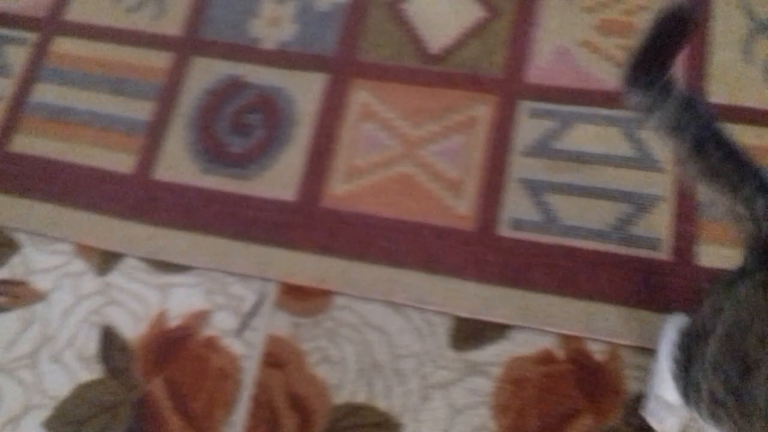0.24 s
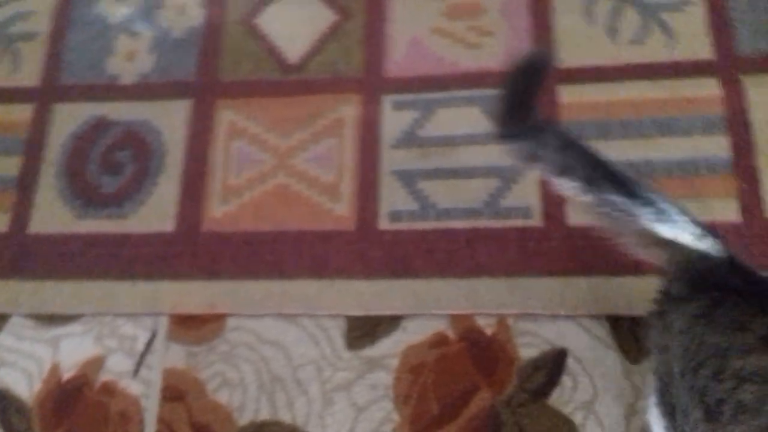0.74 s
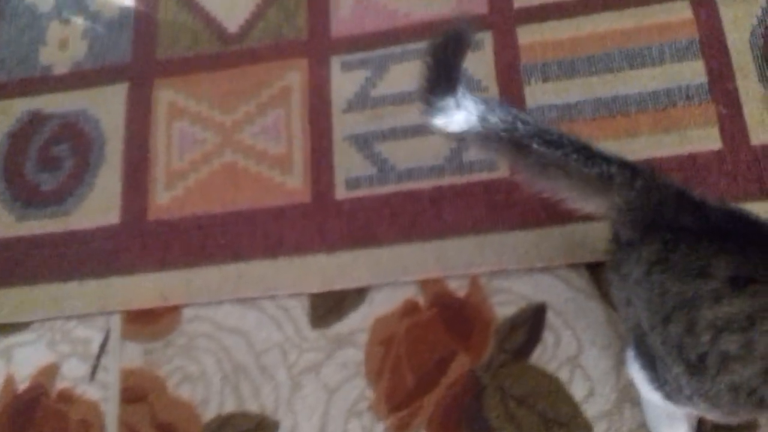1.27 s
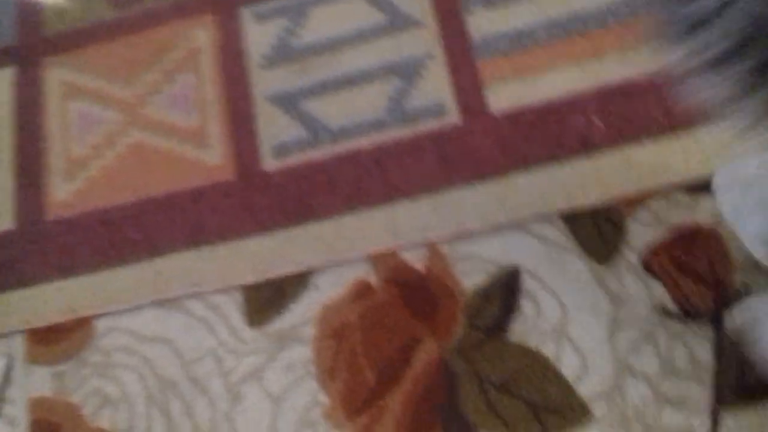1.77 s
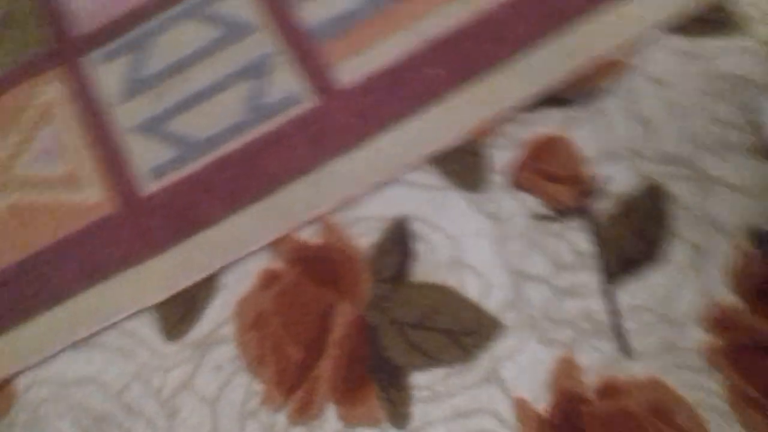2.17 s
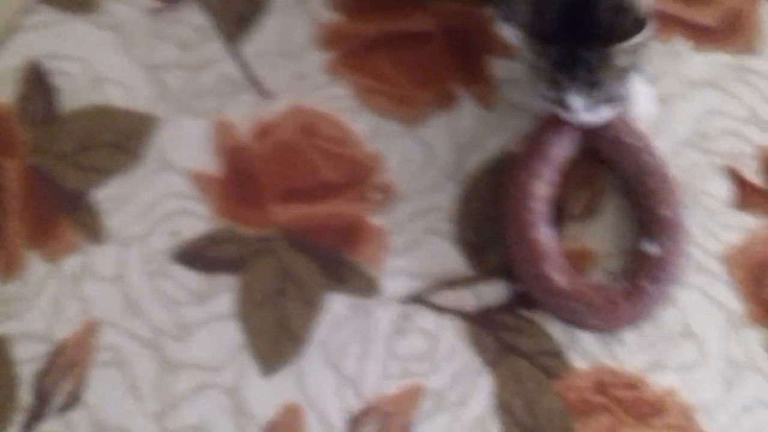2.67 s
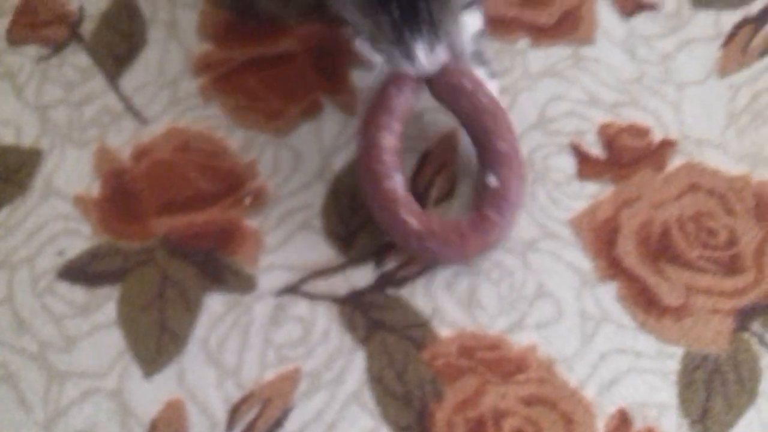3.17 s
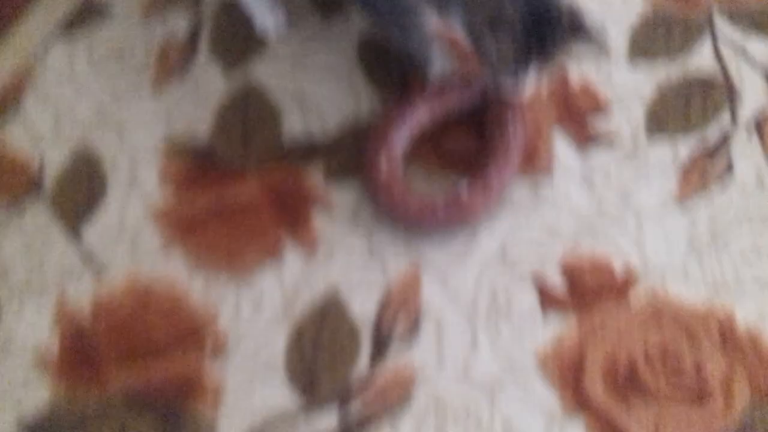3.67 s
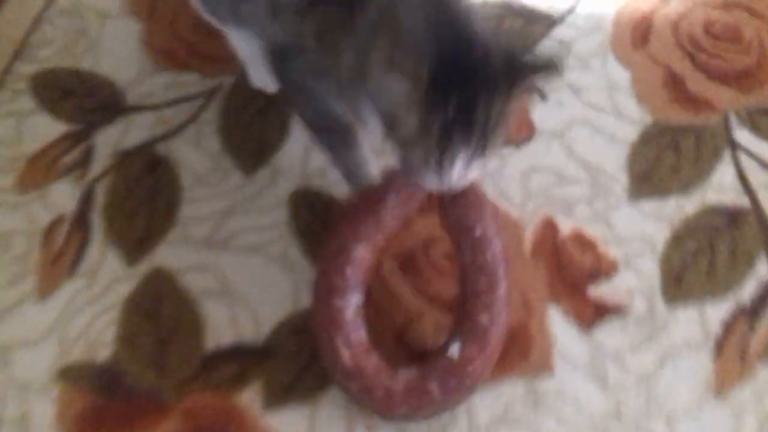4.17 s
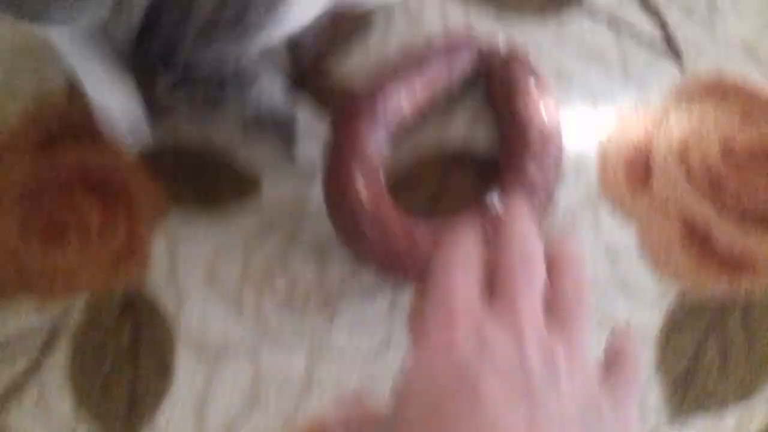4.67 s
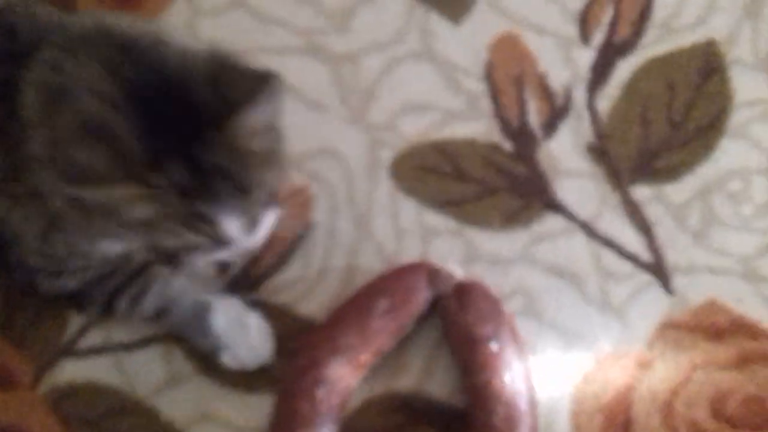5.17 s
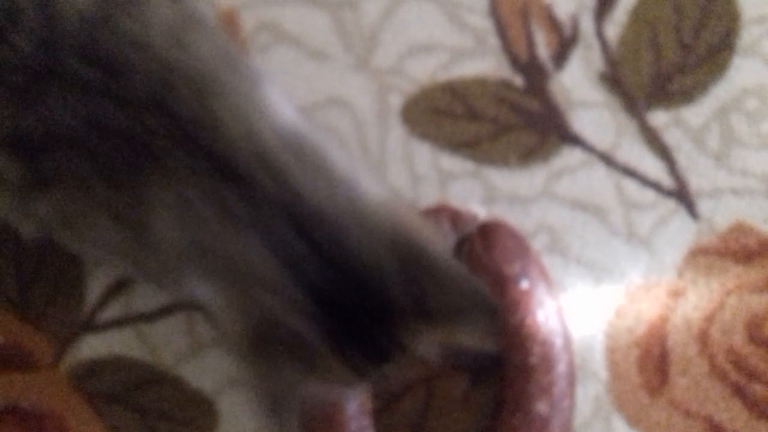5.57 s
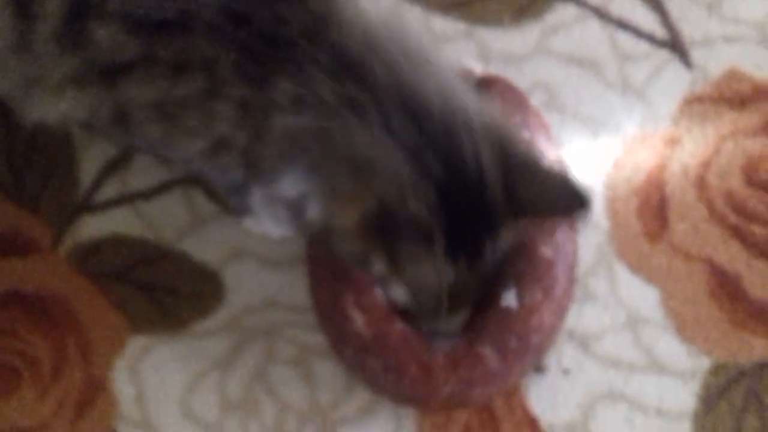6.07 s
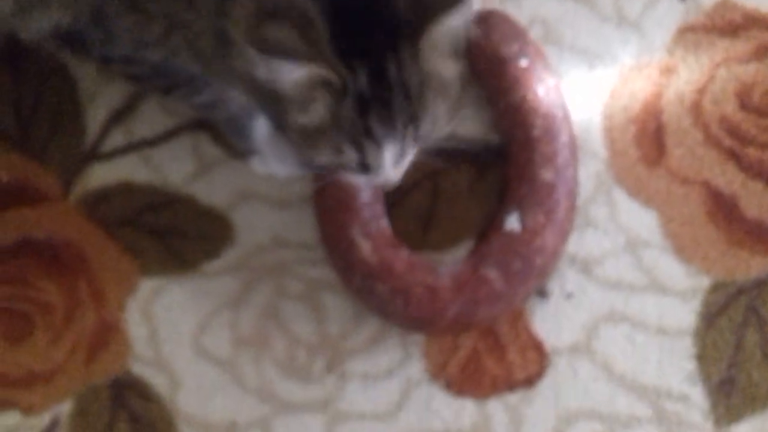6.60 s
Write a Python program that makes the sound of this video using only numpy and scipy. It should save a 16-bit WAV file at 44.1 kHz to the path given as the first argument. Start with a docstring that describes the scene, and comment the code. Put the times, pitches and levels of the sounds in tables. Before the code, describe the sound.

A cat tugs a ring of sausage across a carpet in a small room. A tick and faint brushing come first, then a sharp, knocking thud with a moist smack. More rustling and another thud lead into a busy cluster of soft bumps, clicks and scuffs, which fades to faint stirring. The handheld microphone is close, with quiet room tone and light hiss underneath.

```python
"""A small carpeted room, a handheld microphone close behind a cat that tugs a ring of sausage along.
Sausage and paws land with dull thuds that set the room ringing; fur, cloth and sausage brush the pile.
Small sharp ticks and moist smacks come in between, over quiet room tone and the microphone's hiss."""
import sys
import numpy as np
from scipy import signal
from scipy.fft import rfft, irfft
from scipy.io import wavfile

SR = 44100
rng = np.random.default_rng(int(sys.argv[2]) if len(sys.argv) > 2 else 0)


def materialize(psi):
    """Save the field psi as 16-bit PCM at rate SR to the path in sys.argv[1].

    A 1-D psi becomes a single channel; in a 2-D psi each row is a channel.
    """
    bounded = np.clip(np.atleast_2d(psi).T, -1, 1)
    quanta = np.round(bounded * 32767).astype(np.int16)
    wavfile.write(sys.argv[1], SR, quanta)


N = 301644

# colour of carpet pile being brushed: (frequency [Hz], gain [dB])
CARPET_PILE = [(100, -15.5), (300, -17), (700, -8.5), (1400, -2), (2500, 3.5), (4200, 2), (6000, -2.5),
               (9000, -5.5), (15000, -2)]
# the microphone port thins the bass, rings near 4 kHz and shuts off above: (frequency [Hz], gain [dB])
MIC_PORT = [(25, -15), (65, -25), (100, -8.5), (135, -7), (300, 1), (3200, -2.5), (4400, 4), (5100, -5),
            (6000, -12), (8000, -21.5), (15000, -36)]


def undb(db):
    """Decibels to gain."""
    return 10 ** (np.asarray(db) / 20)


def unit(x):
    """Scale to rms 1."""
    return x / np.sqrt(np.mean(x ** 2))


def butter(order, hz, kind="low"):
    """Butterworth filter sections."""
    return signal.butter(order, hz, kind, fs=SR, output="sos")


def wander(hz):
    """Random drift of rms 1, mostly slower than hz."""
    return unit(signal.sosfilt(butter(2, hz), rng.standard_normal(N)))


def colour(x, points):
    """Causal filter through (Hz, dB) points, built from the cepstrum."""
    size = 2 ** 13
    hz, db = np.transpose(points)
    gain = undb(np.interp(np.log(np.fft.rfftfreq(size, 1 / SR) + 1), np.log(hz), db))
    cepstrum = irfft(np.log(gain))
    cepstrum[1:size // 2] *= 2
    cepstrum[size // 2 + 1:] = 0
    return signal.fftconvolve(x, irfft(np.exp(rfft(cepstrum))))[:len(x)]


def add(track, s, sound):
    """Mix a sound into a track at time s."""
    start = max(int(s * SR), 0)
    track[start:start + len(sound)] += sound[:N - start]


def swell(t, peak_ms):
    """Envelope that rises to 1 at peak_ms and falls away."""
    u = t * 1000 / peak_ms
    return (u * np.exp(1 - u)) ** 2


def burst(hz, peak_ms):
    """A heavily damped vibration that swells while the contact lasts and dies at once."""
    t = np.arange(SR // 10) / SR
    return swell(t, peak_ms) * np.sin(2 * np.pi * hz * t)


def with_room_feed(near, room_db):
    """Pair the close sound with the share of it that goes into the room."""
    return np.array([near, undb(room_db) * near])


def thuds(floor_hz=165, floor_ms=2.37, room_db=-5):
    """Sausage, paws and hand slap the carpet and give the floor under it a slower push."""
    # (time [s], level [dB], pitch [Hz], time to peak [ms], floor thump [dB re the slap])
    landings = [(1.592, -51.5, 890, 0.83, -3), (1.976, -48, 335, 1.9, -15),
                (2.3805, -19.5, 1360, .65, -17.5), (2.383, -17.5, 810, 1.17, -10.5),
                (3.5486, -17, 545, 1.41, -8.5), (3.553, -24, 385, 1.07, -14),
                (3.8081, -23.5, 830, 0.49, -30), (4.1274, -29.5, 750, 0.76, -19),
                (4.4748, -34, 580, 0.83, -19), (4.6042, -26.5, 453, 1.94, -6),
                (4.6347, -18, 507, 1.38, -14), (4.638, -24.5, 265, 1.97, -24),
                (4.7458, -34.5, 710, 0.47, -4), (4.8608, -23, 690, 0.59, -8.5),
                (5.0639, -27, 700, 0.67, -16)]
    near = np.zeros(N)
    for s, db, hz, peak_ms, floor_db in landings:
        thump = undb(floor_db) * burst(floor_hz, floor_ms)
        add(near, s, undb(db) * (burst(hz, peak_ms) + thump))
    return with_room_feed(near, room_db)


def ticks(cycles_to_peak=0.52, crumble_db=-18, crumble_s=0.0051, room_db=-6.5):
    """A snap that peaks within one cycle, trailed by a moment of fine crackle."""
    # sharp little ticks: (time [s], level [dB], pitch [Hz])
    snaps = [(0.0525, -21.5, 2900), (1.122, -37.5, 3470), (1.5914, -30, 3440), (2.0045, -22.5, 3800),
             (2.17, -38, 2800), (2.383, -15.5, 2100), (2.609, -38.5, 3000), (2.6555, -38, 1900),
             (2.8289, -23, 2820), (3.799, -29.5, 2200), (3.9252, -28, 3200), (3.9348, -28, 3200),
             (4.474, -22.5, 2950), (4.4783, -21.5, 3500), (4.5695, -28.5, 2000), (4.609, -19.5, 3500),
             (4.6371, -20.5, 2800), (4.7228, -22.5, 2300), (4.7462, -20.5, 3240), (4.827, -29, 3400),
             (4.8575, -20, 2200), (4.8596, -19.5, 1870), (4.9532, -32, 2200), (5.184, -45, 3450)]
    near = np.zeros(N)
    t = np.arange(SR // 10) / SR
    for s, db, hz in snaps:
        snap = burst(hz, 1000 * cycles_to_peak / hz)
        crumble = undb(crumble_db) * rng.standard_normal(len(t)) * np.exp(-t / crumble_s)
        add(near, s, undb(db) * (snap + crumble))
    return with_room_feed(near, room_db)


def smacks(ring_s=0.0054, fizz_db=-7, fizz_ms=0.31, room_db=-12):
    """A tiny air pocket rings as moist surfaces part; a longer peel dissolves into fizz at that pitch."""
    # moist smacks and squeaks: (time [s], level [dB], pitch [Hz], swell time [ms])
    peels = [(1.199, -49, 2860, 11), (1.311, -48, 3090, 3.9), (1.356, -49.5, 4170, 5.2),
             (1.398, -50.5, 3020, 8.5), (1.4718, -35, 4200, 0.67), (1.523, -51, 3320, 8.2),
             (2.3798, -19, 4050, 0.28), (4.377, -37.5, 2690, 2.4), (4.6247, -26.5, 3580, 1.2),
             (4.6273, -27, 4127, 3.5), (5.839, -51.5, 2690, 1.6)]
    near = np.zeros(N)
    t = np.arange(SR // 20) / SR
    for s, db, hz, swell_ms in peels:
        ring = np.exp(-t / ring_s) * np.sin(2 * np.pi * hz * t)
        fizz = unit(signal.fftconvolve(rng.standard_normal(len(t)), burst(hz, fizz_ms))[:len(t)])
        add(near, s, undb(db) * swell(t, swell_ms) * (ring + undb(fizz_db) * fizz))
    return with_room_feed(near, room_db)


def brushing(fibres_per_s=5000, spread_db=3.0, rub_db=-1, snag_db=1.45, snag_hz=25, room_db=-6):
    """Fibres flick back one by one over a smooth rub; each stroke speeds up, snags and slows down."""
    # strokes over the pile: (fastest moment [s], level [dB], rise [s], fall [s], tilt [steps of 2 dB])
    strokes = [(0.01, -45.5, 0.028, 0.028, -0.5), (.55, -57.5, 0.072, 0.053, -1),
               (0.619, -53.5, 0.038, .026, -1), (1.025, -52, 0.031, 0.049, 0), (1.91, -51, 0.19, 0.15, 1.5),
               (2.228, -52, 0.013, 0.0089, -2.5), (2.477, -47, 0.058, 0.027, -2),
               (2.801, -52, 0.067, 0.073, -1), (3.305, -47, 0.075, 0.095, 1),
               (3.554, -41, 0.0083, 0.0086, -5), (3.941, -49.5, 0.015, 0.031, -4.5),
               (4.123, -49, 0.006, 0.012, -6), (4.31, -51, 0.15, 0.056, 1),
               (4.423, -42.5, 0.005, 0.0099, 1.5), (4.645, -51, 0.081, .08, -1.5),
               (4.868, -38, 0.0052, 0.0051, -0.5), (5.047, -39, .007, 0.029, -3),
               (5.186, -46.5, 0.013, 0.014, 1), (5.333, -38, 0.02, 0.0092, 0.2),
               (6.789, -57, 0.051, .03, 1)]
    t = np.arange(N) / SR
    sizes = undb(spread_db * np.minimum(rng.exponential(size=N), 5))
    flicks = (rng.random(N) < fibres_per_s / SR) * sizes * rng.choice([-1, 1], N)
    rub = undb(rub_db) * rng.standard_normal(N)
    pile = unit(colour(unit(flicks) + rub, CARPET_PILE))
    pile /= np.std(colour(pile, MIC_PORT))  # rms 1 as heard through the port
    power, weighted_tilt = np.full(N, 1e-14), np.zeros(N)
    for s, db, rise, fall, tilt in strokes:
        offset = (t - s) / np.where(t < s, rise, fall)
        stroke = undb(db) ** 2 * np.exp(-2 * np.minimum(offset ** 2, 20))
        power += stroke
        weighted_tilt += stroke * tilt
    # each stroke has its own brightness: low and high bands tip against each other
    low = signal.sosfiltfilt(butter(2, 1600), pile)
    high = signal.sosfiltfilt(butter(3, 6300, "high"), pile)
    mid = pile - low - high
    tip = undb(2 * weighted_tilt / power)
    snags = undb(snag_db * wander(snag_hz))
    near = np.sqrt(power) * snags * (low / tip + mid + high * tip)
    return with_room_feed(near, room_db)


def fidgeting(rustle_db=-5, crackle_db=-12.5, pops_per_s=50, spread_db=4.0, pop_ms=0.28, room_db=-5):
    """Cat and handheld microphone keep moving between strokes: a faint rustle with small crackles."""
    # restless movement: (time [s], level [dB])
    restlessness = [(0.0, -75), (0.15, -60.5), (0.95, -64.5), (1.18, -57), (1.73, -61.5), (1.9, -58),
                    (2.1, -58), (3.22, -61), (3.41, -48), (3.75, -54.5), (4.04, -56), (4.38, -50.5),
                    (4.78, -48.5), (5.62, -66), (6.32, -80.5), (6.84, -64)]
    movement = undb(np.interp(np.arange(N) / SR, *np.transpose(restlessness)))
    rustle = unit(colour(rng.standard_normal(N), CARPET_PILE))
    crackle = np.zeros(N)
    for hz in (2600, 3100, 3800):
        pops = rng.random(N) < pops_per_s / SR
        sizes = undb(spread_db * np.minimum(rng.exponential(size=N), 3))
        crackle += signal.fftconvolve(pops * sizes, burst(hz, pop_ms))[:N]
    near = movement * (undb(rustle_db) * rustle + undb(crackle_db) * unit(crackle))
    return with_room_feed(near, room_db)


def room(feed, t60_low=0.43, t60_high=0.37, gap_s=0.00093, build_s=0.0033, modes_db=-62):
    """Dense reflections change as cat and microphone move; standing waves linger in the bass."""
    # standing waves: (frequency [Hz], relative level [dB], time to fall 60 dB [s])
    standing_waves = [(128.3, -1.5, 0.88), (184.4, 12, 0.28), (242.3, -12, 0.92), (278.5, 12.5, 0.28),
                      (380, -4, 1), (533, -5, 0.35), (599, 17, 0.13), (804, -12.5, 0.85)]
    # colour of the diffuse tail off the walls: (frequency [Hz], gain [dB])
    wall_colour = [(80, -0.5), (200, 2), (400, 4), (700, 1.5), (1300, 2), (2500, 0.5), (5000, -4),
                   (10000, 7)]
    size, hop = SR // 2, SR // 8
    t = np.arange(size) / SR
    starts = range(0, N, hop)  # a fresh tail for each stretch of the feed
    noise = rng.standard_normal((len(starts), size))
    low = signal.sosfiltfilt(butter(2, 500), noise)
    onset = 1 - np.exp(-np.maximum(t - gap_s, 0) / build_s)
    fade = np.exp(-np.log(1000) * t)  # 60 dB a second
    tails = onset * (low * fade ** (1 / t60_low) + (noise - low) * fade ** (1 / t60_high))
    diffuse = np.zeros(N)
    for start, tail in zip(starts, tails):
        reflections = signal.fftconvolve(feed[start:start + hop], tail / np.linalg.norm(tail))
        add(diffuse, start / SR, reflections)
    modes = sum(undb(db) * fade ** (1 / t60) * np.sin(2 * np.pi * hz * t)
                for hz, db, t60 in standing_waves)
    ringing = signal.fftconvolve(feed, undb(modes_db) * onset * modes)[:N]
    return colour(diffuse, wall_colour) + ringing


def room_tone(level_db=-64):
    """The still room: a faint, steady noise, strongest in the bass."""
    # (frequency [Hz], relative density [dB])
    still_air = [(25, 16.5), (60, 11.5), (130, 1.5), (250, -5), (600, 0.5), (1000, 0), (2000, -1.5),
                 (4200, -9.5), (8000, -7)]
    return undb(level_db) * unit(colour(rng.standard_normal(N), still_air))


def scene(width_db=-17, width_s=0.0064):
    """All plays close and centred; only the upper reflections differ a little between the sides."""
    near, feed = thuds() + ticks() + smacks() + brushing() + fidgeting()
    echo = room(feed)
    side = np.zeros(N)
    add(side, width_s, undb(width_db) * signal.sosfilt(butter(2, 900, "high"), echo))
    return near + echo + room_tone() + np.array([side, -side])


def record(dry, hiss_db=-72.2, whine_hz=14350, whine_db=-95, waver_hz=30, top_hz=15750):
    """The microphone port colours the sound; each channel's own hiss and a faint whine lie under it."""
    sound = np.array([colour(channel, MIC_PORT) for channel in dry])
    hiss = undb(hiss_db) * rng.standard_normal((2, N))
    whine = undb(whine_db) * wander(waver_hz) * np.sin(2 * np.pi * whine_hz * np.arange(N) / SR)
    treble_cut = signal.ellip(10, .1, 70, top_hz, fs=SR, output="sos")
    return signal.sosfilt(treble_cut, sound + hiss + whine)


dry = scene()
out = record(dry)
materialize(out)
```